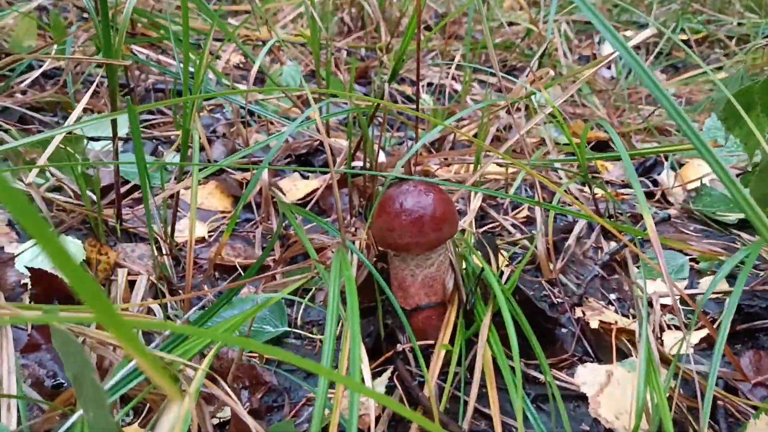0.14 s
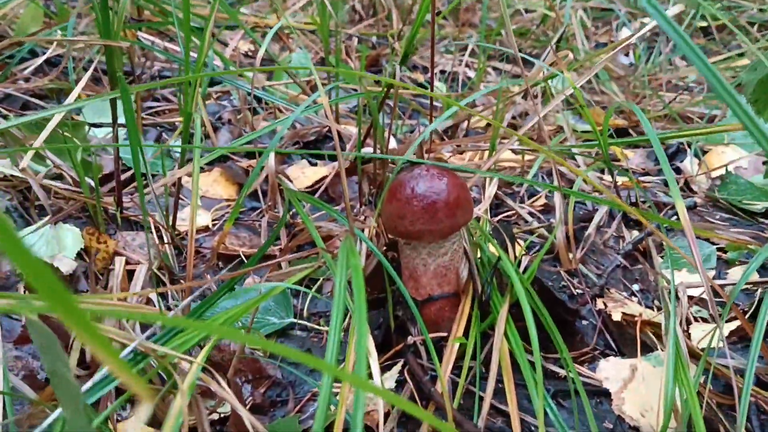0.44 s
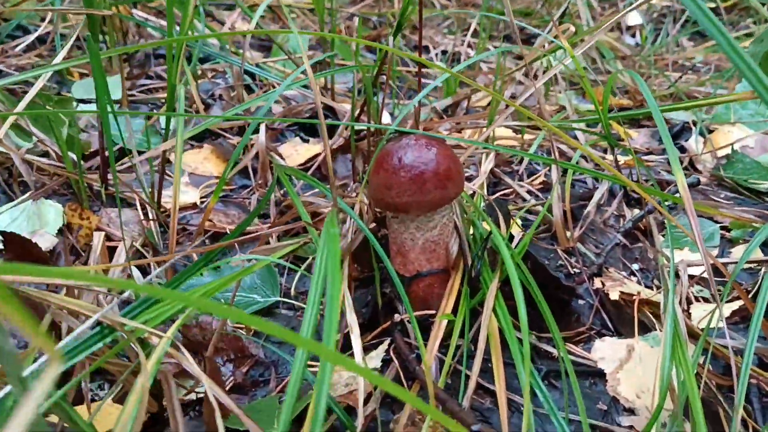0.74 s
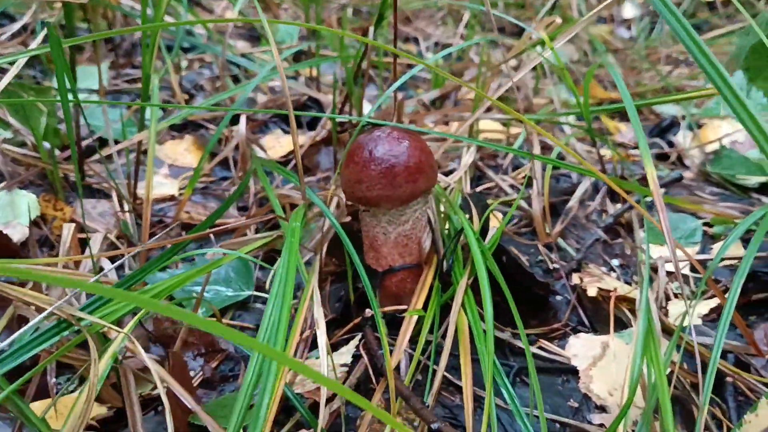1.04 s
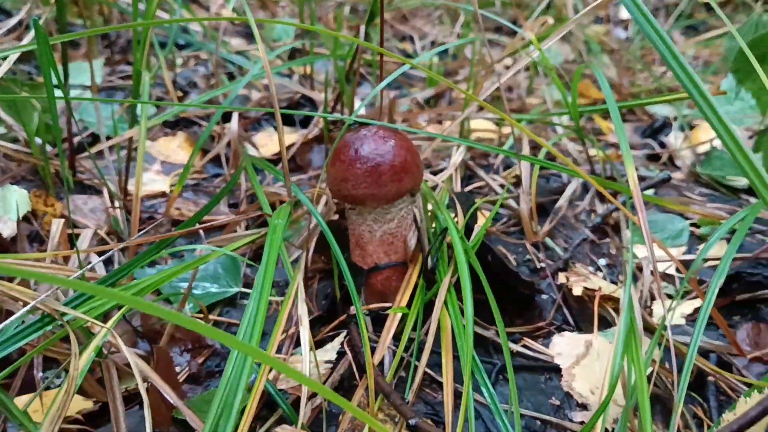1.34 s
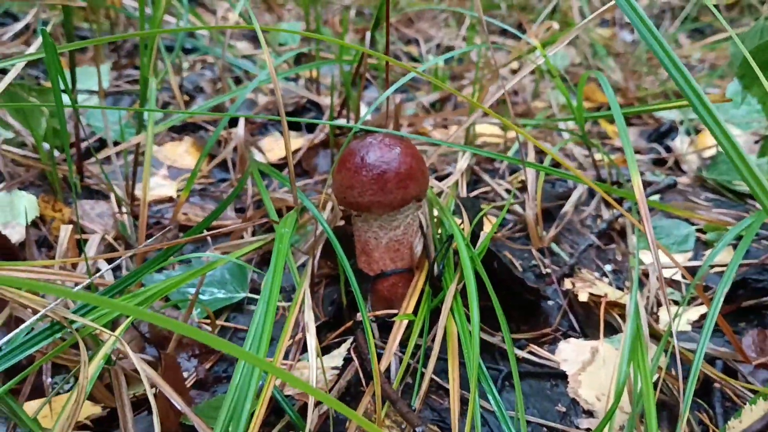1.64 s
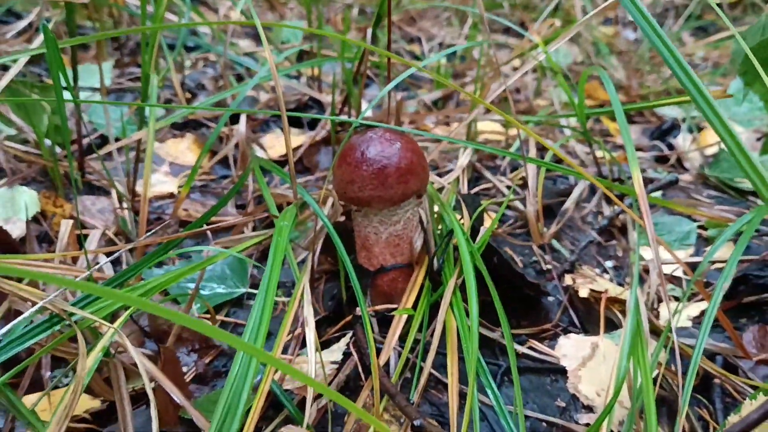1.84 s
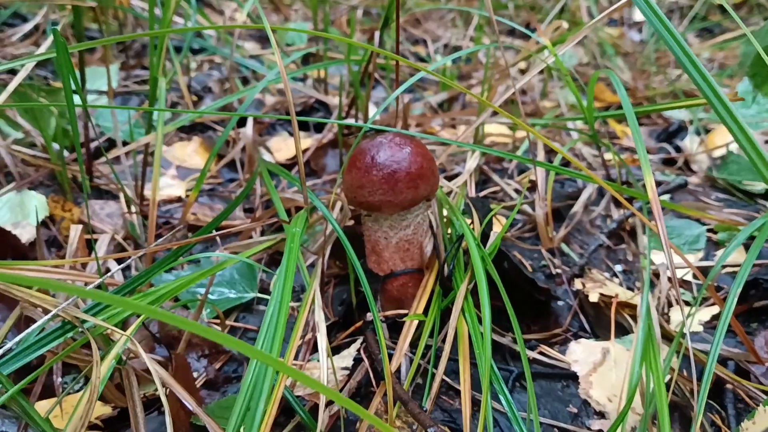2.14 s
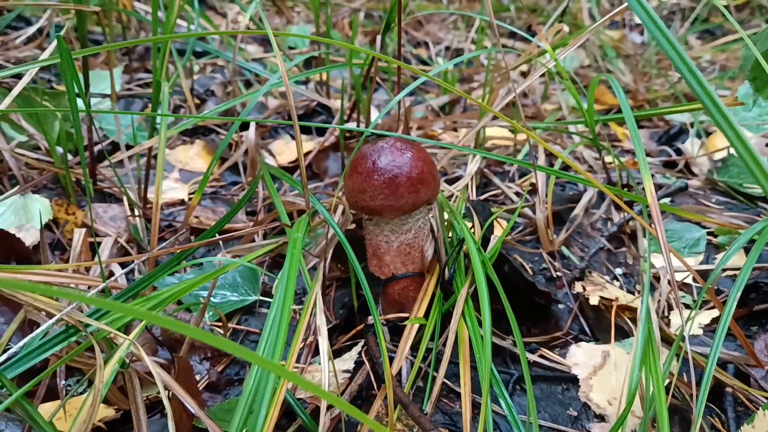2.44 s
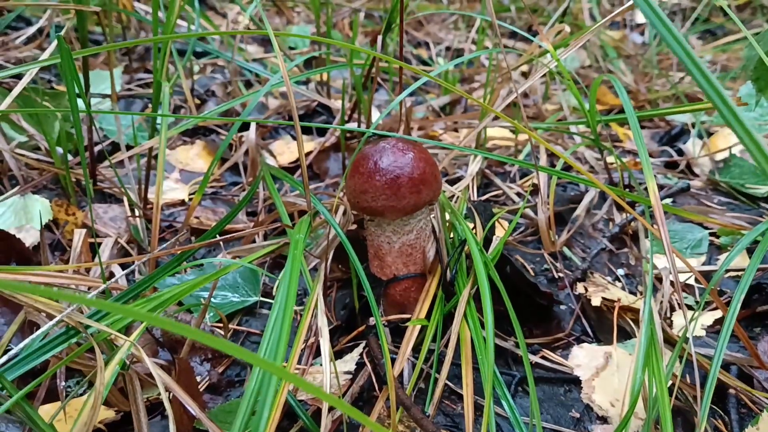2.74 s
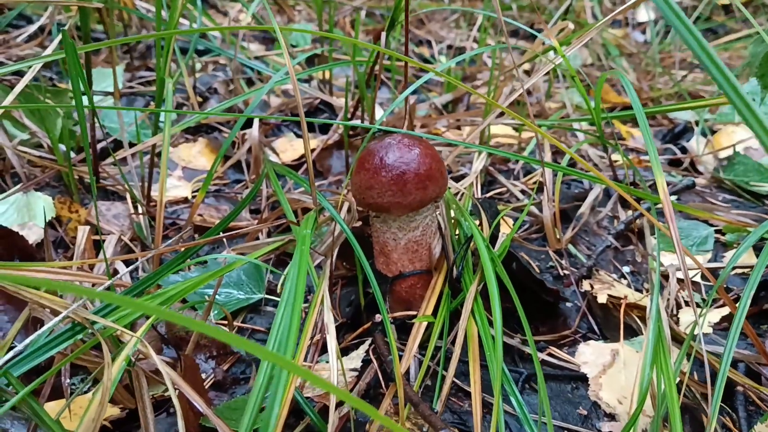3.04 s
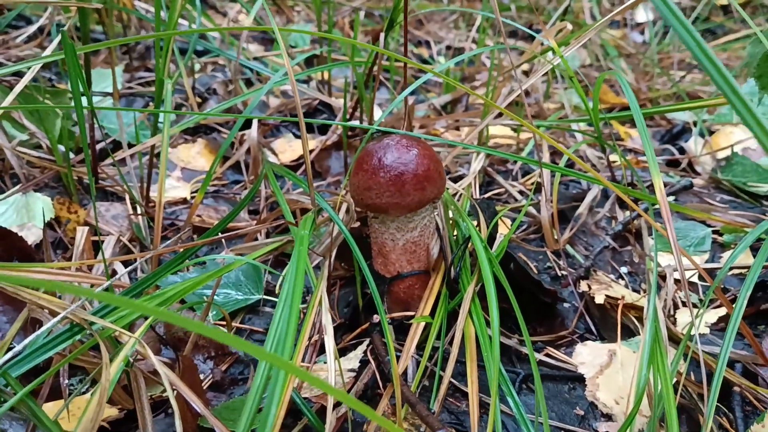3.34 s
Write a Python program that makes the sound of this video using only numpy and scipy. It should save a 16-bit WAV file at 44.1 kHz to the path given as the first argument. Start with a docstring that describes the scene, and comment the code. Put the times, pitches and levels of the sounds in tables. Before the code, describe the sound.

Drops tick lightly on forest leaves and litter after rain, with a steady soft hiss behind. Grass brushes faintly and handling bumps the low microphone, once sharply, before a large drop splats on a nearby leaf near the end.

```python
"""A wet wood after rain, from a hand-held camera's stereo microphone close to the ground.
From the start, countless far drips merge into a soft hiss and nearer drops tick on leaves and litter.
The hand rumbles briefly, and at half a second the treble on the right opens as the camera settles.
Grass brushes faintly and the case takes dull knocks, the sharpest at 2 s. Just before 3 s a big drop
splats on a leaf beside the microphone; then the grip creaks on the right."""
import sys
import numpy as np
from scipy import signal
from scipy.io import wavfile
from scipy.ndimage import uniform_filter1d

SR = 44100
rng = np.random.default_rng(int(sys.argv[2]) if len(sys.argv) > 2 else 0)


def dump_mix(stems):
    """Bounce the given channels to the path in sys.argv[1] as a 16-bit WAV at rate SR."""
    frames = np.atleast_2d(stems).T  # one column per channel
    limited = np.clip(frames, -1, 1)  # hard clip at full scale
    pcm = np.round(limited * 32767).astype(np.int16)
    wavfile.write(sys.argv[1], SR, pcm)


N = 154350
TIME = np.arange(N) / SR
TAPS = 2048  # samples in one short sound
TAP_TIME, BINS = np.arange(TAPS) / SR, np.fft.rfftfreq(TAPS, 1 / SR)

# far hiss at the left and the right microphone port: freq_hz, density_db (per Hz)
HISS_LEFT = [(25, -104.0), (45, -92), (95, -82), (200, -87.5), (450, -90), (850, -90.5), (1400, -86.5),
             (2200, -83.5), (3300, -87.5), (4200, -95.5), (6300, -96), (8200, -103.3), (11800, -97.5),
             (15500, -105)]
HISS_RIGHT = [(25, -103.5), (45, -108), (95, -81), (200, -86.5), (450, -90), (850, -90.5), (1400, -87),
              (2200, -82.5), (3200, -84), (4200, -88), (6000, -88), (8000, -89.5), (10000, -99.5),
              (13000, -107.3), (15500, -106)]
# likeness of the hiss at the two ports: freq_hz, coherence (0 to 1)
HISS_COHERENCE = [(60, 0.57), (450, 0.44), (1000, 0.01)]
# slow drift of the hiss: time_s, level_db
HISS_SWELL = [(0, -0.5), (.6, -1.5), (1.1, -0.85), (1.5, -0.65), (1.9, -0.5), (2.3, -1.34), (3.0, -1),
              (3.5, -2.5)]
# upper edge of the hiss on the right: time_s, edge_hz
HISS_EDGE = [(0, 6300), (.2, 6100), (.37, 5650), (.55, 7600), (.92, 7900), (1.15, 8060), (2.9, 8060),
             (3.5, 7700)]
# thin sheen at the very top on the right: time_s, level_db
SHEEN_LEVEL = [(0, -62), (.4, -67), (.62, -57), (.9, -53), (1.1, -68), (3.5, -74)]
# its colour: freq_hz, gain_db
SHEEN_COLOUR = [(11000, -34), (13500, -13), (15500, 0)]
# leaves dripped on in the middle distance: freq_hz, gain_db
DRIP_COLOUR = [(200, -11), (800, -6.5), (2500, 2), (5000, -8), (7000, -9), (9000, -16), (15000, -26)]
# soft rustles of grass: centre_s, length_s, pitch_hz, level_db
RUSTLES = [(.72, .05, 2100, -56), (1.44, .05, 2380, -49.5), (1.716, 0.052, 2120, -53),
           (2.658, 0.045, 5500, -56), (3.116, 0.091, 2500, -63)]
# rumble of the hand while the camera moves: time_s, level_db
RUMBLE_LEVEL = [(0, -55), (.15, -56), (.35, -60), (.48, -51.5), (.65, -67), (.85, -70), (3.5, -73)]
# its colour: freq_hz, gain_db
RUMBLE_COLOUR = [(25, -13), (60, 4), (110, -7.5), (250, -20), (800, -38), (3000, -70)]
# slips of the grip: start_s, relative_db
CREAKS = [(3.1759, -1.5), (3.1794, -3.5), (3.181, 0), (3.1834, 3.5)]
# their colour: freq_hz, gain_db
CREAK_COLOUR = [(100, -33), (400, -3.5), (900, 2.5), (1800, -0.5), (3200, -12), (6000, -21), (15000, -24)]
# knocks on the case: start_s, thud_db, thud_left_minus_right_db, ring_db, click_db
KNOCKS = [(.254, -45.5, -12, -69, -60), (0.445, -37, -30, -52, -45), (0.453, -39.5, -28, -67, -46),
          (0.8009, -33, -3, -39, -48), (1.019, -44.5, 9, -67, -30), (1.826, -39, -8, -50, -50),
          (1.9082, -40.5, -17, -26.5, -15.5), (1.942, -29, -23, -55, -50), (2.003, -24, -23, -12.5, -1.5),
          (2.043, -52, -12, -56, -26.5), (2.098, -42.5, -27, -56, -29), (2.531, -35.5, -21, -61, -50),
          (2.939, -20.5, 12, -56, -34)]
# contact click of a knock: freq_hz, left_db, right_db
CONTACT_COLOUR = [(60, 11, 0), (185, -5, 23.5), (520, -34, 7.5), (910, -22, 18.5), (1790, -31, 10),
                  (3570, 3.5, 7.5), (4600, -26, -20), (7440, -35, 0), (11000, -36, -15), (15000, -48, -23)]
# near drops on leaves: start_s, decay_s, left_minus_right_db, then level_db at each of TICK_BANDS_HZ
TICKS = [(0.2393, 0.00032, 14, -39, -12, -31, -23.5), (0.2888, 0.00022, -13, -10.5, -6, -32, -55),
         (0.4722, 0.0013, -13, -26, -22, -20, -48), (0.751, 0.0009, 8, -8, -25, -19.5, -16.5),
         (0.8007, 0.0037, -9.5, -9.5, -13, -5.5, -31), (1.0704, 0.0015, -11, -27, -20, -32, -39),
         (1.107, 0.002, 1, -13, -16, -24, -28), (1.2893, 0.0022, 0, -27, -8.5, -22, -32),
         (1.345, 0.00097, -8, -26, -6, -31, -38), (1.444, 0.0017, -5, -21, -6.5, -18, -34),
         (1.4508, 0.0033, -2, -15, -13, -18, -24), (1.4791, 0.0025, -3, -35, -13, -16, -30),
         (1.5069, 0.0019, -21, -28, -16, -33, -49), (1.7615, 0.0011, -4, -13, -16, -19, -32),
         (2.097, 0.0023, -20, -7.5, -18, -35, -42), (2.1447, 0.0032, -21, -18, -16, -23, -32),
         (2.1505, 0.0032, -14, -16, -13.5, -25, -26), (2.3418, 0.0027, 1, -20, -8.5, -26, -31),
         (2.5745, 0.00031, -15, -18, -24, -13, -22), (2.579, 0.0024, 0, -15, -27, -19, -10.5),
         (2.616, 0.0017, 11, -8, -9.5, -30, -27), (2.6522, 0.00095, -14, -17, -12.5, -16, -23),
         (2.6723, 0.00084, -15, -26, -1, -48, -33), (2.9395, 0.0012, -7, -15, -7, -30, -22),
         (2.944, 0.00091, -2, -17, -24, -17, -7), (3.0692, 0.0041, -1, -13, -17, -16, -20.5),
         (3.1451, 0.0013, -8, -29, -13.5, -23, -34), (3.3038, 0.001, 6, -29, -20, -16.5, -29),
         (3.3864, 0.0022, 3, -16.5, -16.5, -28, -20)]
# where a near drop's colour is set: freq_hz
TICK_BANDS_HZ = [550, 2500, 6800, 13000]
# near leaves set ringing: start_s, pitch_hz, level_db, t60_s, left_minus_right_db
PINGS = [(.2889, 2480, -22.5, .004, -21), (.7512, 567, -37.5, .009, 4), (1.4787, 3400, -32.5, 0.014, -13),
         (2.579, 7660, -28.5, 0.0065, -22)]
# the close splat, a quick run of impacts: start_s, decay_s, relative_db
SPLAT_IMPACTS = [(2.96, .001, -26), (2.9597, 0.0011, -6), (2.9626, 0.00099, -10), (2.9638, 0.00055, -1),
                 (2.9655, 0.0014, -5), (2.97, .002, -12), (2.9712, 0.0012, -15.5)]
# their colour: freq_hz, left_db, right_db
SPLAT_COLOUR = [(150, -8, -13), (456, -18, -4.5), (1110, -6, -0.5), (1890, 8.5, 15), (2400, 9, 7.5),
                (3080, 8, 18), (3920, -8, 3), (5300, 0, 7.5), (6340, -14, -0.5), (7200, -8, 12),
                (8440, -12, -1.5), (11500, 0.5, -11), (15300, -14, -7)]
# modes of the splashed leaf: pitch_hz, level_db, t60_s
LEAF_MODES = [(1640, -45, 0.032), (1840, -29.5, 0.04), (2020, -28, 0.068), (2470, -31, 0.043),
              (2980, -41, 0.023), (6830, -47, 0.019)]


def amp(db):
    """Decibels to gain."""
    return 10 ** (np.asarray(db) / 20)


def unit_rms(x):
    """Scales to rms 1."""
    return x / np.sqrt(np.mean(x ** 2) + 1e-20)


def spectrum(points, hz=BINS, column=1):
    """One column of a spectrum table, interpolated on a log-frequency axis."""
    table = np.transpose(points)
    return np.interp(np.log(hz + 1), np.log(table[0] + 1), table[column])


def curve(points, t):
    """A control curve at times t."""
    return np.interp(t, *np.transpose(points))


def pan(db):
    """Left and right gains of mean power 1; positive db leans left."""
    return unit_rms(amp([[db / 2], [-db / 2]]))


def add(mix, start_s, sound):
    """Mixes in a stereo sound."""
    part = mix[:, round(start_s * SR):][:, :sound.shape[1]]
    part += sound[:, :part.shape[1]]


def click(db):
    """The sharpest causal click that has this spectrum."""
    log_gain = np.log(amp(np.concatenate([db, db[-2:0:-1]])))
    return np.fft.ifft(np.exp(np.conj(signal.hilbert(log_gain)))).real


def spatter(decay_s, colour_db, rise_s=0.00021):
    """A dying noise burst of energy 1, then coloured: water breaking on a leaf, or a rattle."""
    burst = rng.standard_normal(TAPS) * (1 - np.exp(-TAP_TIME / rise_s))
    burst *= np.exp(-TAP_TIME / max(decay_s, rise_s))
    return signal.fftconvolve(burst / np.linalg.norm(burst), click(colour_db))


def mode(hz, t60_s, lead_turns=0):
    """One struck, dying vibration."""
    return np.sin(2 * np.pi * (hz * TAP_TIME + lead_turns)) * np.exp(-np.log(1000) * TAP_TIME / t60_s)


def right_noise(colour, level):
    """Coloured noise on a level curve, at the right port only."""
    noise = signal.oaconvolve(rng.standard_normal(N), click(spectrum(colour)))[:N]
    return np.array([np.zeros(N), unit_rms(noise) * amp(curve(level, TIME))])


def far_hiss(patchy_db=1.28, flicker_db=0.5, open_hz=8270, squeeze_from_hz=3360):
    """Drips deep in the wood merge into noise, unrelated at the two ports from 1 kHz up."""
    size, hop = 1024, 256
    frames, hz = N // hop + 5, np.fft.rfftfreq(size, 1 / SR)
    t = np.arange(frames) * hop / SR
    left_re, left_im, apart_re, apart_im, patches = rng.standard_normal((frames, len(hz), 5)).T
    patches = uniform_filter1d(patches, size=14, axis=0)
    patches = unit_rms(uniform_filter1d(patches, size=8, axis=1))
    coherence = spectrum(HISS_COHERENCE, hz)[:, None]
    left = left_re + 1j * left_im
    right = coherence * left + np.sqrt(1 - coherence ** 2) * (apart_re + 1j * apart_im)
    # an edge below open_hz squeezes the right treble downward
    squeeze = (open_hz / curve(HISS_EDGE, t)) ** np.clip(hz / squeeze_from_hz - 1, 0, 1)[:, None]
    ports = np.array([left * amp(spectrum(HISS_LEFT, hz[:, None])),
                      right * amp(spectrum(HISS_RIGHT, hz[:, None] * squeeze))])
    ports *= amp(curve(HISS_SWELL, t) + patchy_db * patches + flicker_db * rng.standard_normal(frames))
    density_gain = np.sqrt(3 / 8 * SR / hop)
    return density_gain * signal.istft(ports, nperseg=size, noverlap=size - hop)[1][:, :N]


def wood_scatter(x, t60_s=0.15):
    """Short reflections from the ground and the stems around the microphone."""
    t = np.arange(SR // 4) / SR
    tail = rng.standard_normal((2, len(t))) * np.exp(-np.log(1000) * t / t60_s)
    return signal.oaconvolve(x, tail / np.linalg.norm(tail[0]), axes=1)[:, :N]


def middle_drips(leaves=24, drips_per_s=97, softest_db=-34.5, spread_db=3.5, vary_db=2.5, decay_s=0.002):
    """Leaves in the middle distance, each with its own colour and place, dripped on at random."""
    out = np.zeros((2, N))
    hz, db = np.transpose(DRIP_COLOUR)
    for _ in range(leaves):
        colour = np.c_[hz, db + vary_db * rng.standard_normal(len(hz))]
        sizes = amp(softest_db + spread_db * np.minimum(rng.exponential(1, N), 3))
        impacts = sizes * (rng.random(N) < drips_per_s / leaves / SR)
        place = pan(-4 + 4 * rng.standard_normal())  # mostly to the right
        out += place * signal.oaconvolve(impacts, spatter(decay_s, spectrum(colour)))[:N]
    return out


def grass_rustles(grains_per_s=820, db_per_octave=-11):
    """Blades of grass brush each other: small swells of fine grains."""
    out = np.zeros((2, N))
    for centre_s, length_s, hz, db in RUSTLES:
        grains = rng.standard_normal((2, N)) * (rng.random((2, N)) < grains_per_s / SR)
        blade = click(db_per_octave * abs(np.log2((BINS + 20) / hz)))
        swell = np.exp(-(2 * (TIME - centre_s) / length_s) ** 2)
        out += amp(db) * swell * unit_rms(signal.oaconvolve(grains, blade[None], axes=1)[:, :N])
    return out


def hand_rumble():
    """The hand moves the camera, and the right port picks up a low rumble."""
    return right_noise(RUMBLE_COLOUR, RUMBLE_LEVEL)


def grip_creaks(gain_db=-6, pan_db=-29):
    """The grip slips in a few tiny steps by the right port."""
    out, slip = np.zeros((2, N)), click(spectrum(CREAK_COLOUR))
    for start_s, db in CREAKS:
        add(out, start_s, amp(gain_db + db) * pan(pan_db) * slip)
    return out


def case_mode(hz, t60_s, right_lead_turns=0.21, rise_s=0.00049):
    """One mode of the camera's case, out of step at the two ports."""
    return mode(hz, t60_s, np.array([[0], [right_lead_turns]])) * (1 - np.exp(-TAP_TIME / rise_s))


def case_knocks(rattle_db=-11, rattle_s=0.0023, thud_cut_hz=41):
    """Each knock clicks with a slight rattle and sets off a low thud and a hollow ring in the case."""
    out, colours = np.zeros((2, N)), [spectrum(CONTACT_COLOUR, column=port) for port in (1, 2)]
    contact = np.array([click(colour) for colour in colours])
    thud = case_mode(hz=146, t60_s=0.027) + amp(-6) * case_mode(hz=275, t60_s=0.029)
    thud = signal.sosfilt(signal.butter(1, thud_cut_hz, "high", fs=SR, output="sos"), thud)
    ring = case_mode(hz=408, t60_s=0.03)
    for start_s, thud_db, pan_db, ring_db, click_db in KNOCKS:
        body = amp(thud_db) * pan(pan_db) * thud + amp(ring_db) * ring
        rattle = np.array([spatter(rattle_s, colour) for colour in colours])
        add(out, start_s, body - amp(click_db) * contact)
        add(out, start_s, amp(click_db + rattle_db) * rattle)
    return out


def near_ticks(bass_hz=80, bass_lift_db=12):
    """Single drops break on leaves near the microphone."""
    out = np.zeros((2, N))
    for start_s, decay_s, pan_db, *band_db in TICKS:
        colour = spectrum([(bass_hz, band_db[0] + bass_lift_db), *zip(TICK_BANDS_HZ, band_db)])
        add(out, start_s, pan(pan_db) * np.array([spatter(decay_s, colour), spatter(decay_s, colour)]))
    return out


def leaf_pings():
    """A few near drops leave a brief pitch in the leaf they hit."""
    out = np.zeros((2, N))
    for start_s, hz, db, t60_s, pan_db in PINGS:
        add(out, start_s, amp(db) * pan(pan_db) * mode(hz, t60_s))
    return out


def close_splat(crack_db=-0.5, spray_db=0.5, ring_pan_db=-3):
    """A big drop bursts beside the microphone: each impact cracks and sprays, the hardest rings a leaf."""
    out, colours = np.zeros((2, N)), [spectrum(SPLAT_COLOUR, column=port) for port in (1, 2)]
    crack = np.array([click(colour) for colour in colours])
    for start_s, decay_s, db in SPLAT_IMPACTS:
        spray = np.array([spatter(decay_s, colour) for colour in colours])
        add(out, start_s, amp(db + crack_db) * crack)
        add(out, start_s, amp(db + spray_db) * spray)
    hardest_s = max(SPLAT_IMPACTS, key=lambda row: row[2])[0]
    ring = sum(amp(db) * mode(hz, t60_s) for hz, db, t60_s in LEAF_MODES)
    add(out, hardest_s, pan(ring_pan_db) * ring)
    return out


def scene(foliage_send_db=-9, splat_send_db=-24):
    """Far hiss, foliage with its reflections, a nearly dry splat and touches on the camera."""
    foliage = near_ticks() + leaf_pings() + middle_drips() + grass_rustles()
    splat = close_splat()
    background = far_hiss() + right_noise(SHEEN_COLOUR, SHEEN_LEVEL)
    handling = case_knocks() + grip_creaks() + hand_rumble()
    reflections = wood_scatter(amp(foliage_send_db) * foliage + amp(splat_send_db) * splat)
    return background + reflections + handling + foliage + splat


def record(dry, low_cut_hz=56, high_cut_hz=16000):
    """The microphone's bass roll-off and the band limit."""
    thin = signal.sosfilt(signal.butter(3, low_cut_hz, "high", fs=SR, output="sos"), dry)
    band_limit = signal.firwin(511, high_cut_hz, window=("kaiser", 9), fs=SR)
    return signal.oaconvolve(thin, band_limit[None], "same")


dry = scene()
out = record(dry)
dump_mix(out)
```